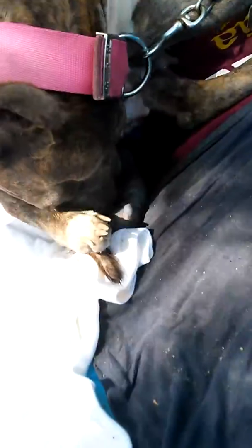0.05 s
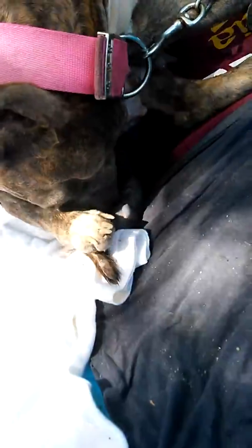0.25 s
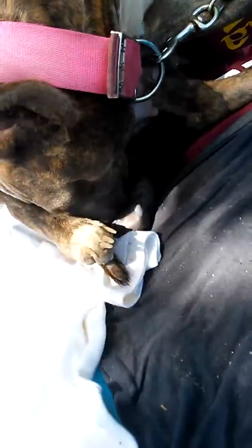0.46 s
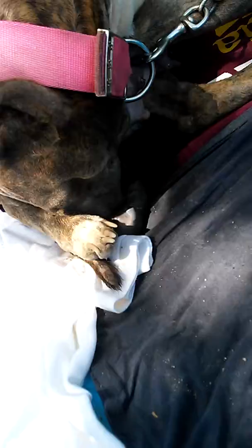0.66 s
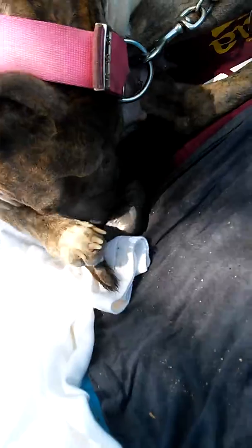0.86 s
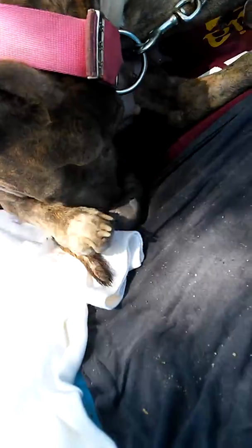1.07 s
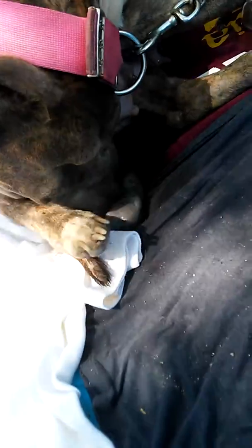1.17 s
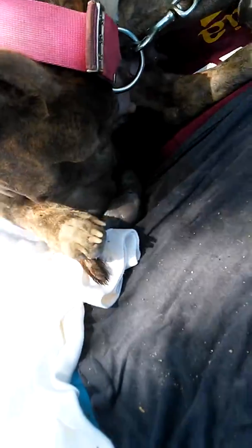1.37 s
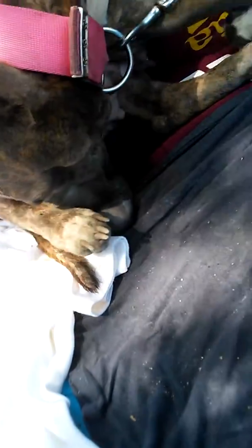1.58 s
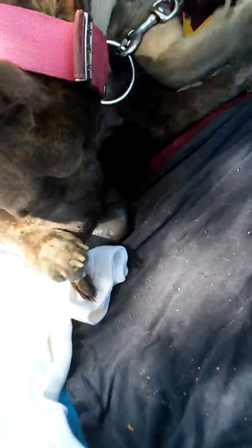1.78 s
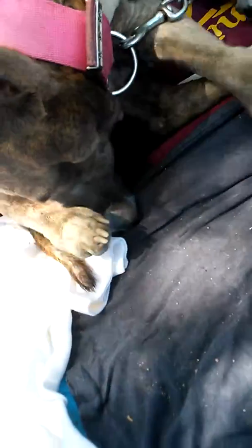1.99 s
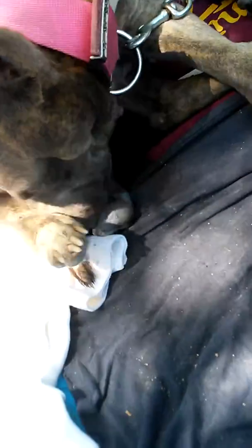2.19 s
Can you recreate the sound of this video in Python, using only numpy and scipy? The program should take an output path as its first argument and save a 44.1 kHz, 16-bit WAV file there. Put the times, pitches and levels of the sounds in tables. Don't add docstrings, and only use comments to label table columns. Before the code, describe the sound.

Dog licking, close and wet: smacks and sticky clicks at 0-0.12 s with heavy low thumps, another sharp cluster near 0.45, thin saliva squeaks at 0.65-0.77, then a smack at 0.82. A thump at 0.92 leads to quick sniffs from 1.0 and smacks around 1.24. Dull bumps run 1.4-1.66, a short wet lick at 1.68, faint whistles near 1.9, soft licking at 2.08. Dry cabin, low rumble, hiss, far chirring.

```python
import sys
import numpy as np
from scipy import signal
from scipy.fft import rfft, irfft, next_fast_len
from scipy.io import wavfile
from scipy.ndimage import uniform_filter1d, map_coordinates

SR = 44100
rng = np.random.default_rng(int(sys.argv[2]) if len(sys.argv) > 2 else 0)


def log_audio(samples):
    frames = np.atleast_2d(samples).T
    limited = np.clip(frames, -1, 1)
    pcm = np.round(limited * 32767).astype(np.int16)
    wavfile.write(sys.argv[1], SR, pcm)


def gain_from_db(level_db):
    decades = np.asarray(level_db, float) / 20
    return 10 ** decades


N = 98607
TIME_S = np.arange(N) / SR


def unit(x):
    return x / np.sqrt(np.mean(x ** 2) + 1e-20)


def wobble(rate_hz):
    knots = rng.standard_normal(int(N * 1000 / SR) + 4)
    return map_coordinates(knots, [TIME_S * rate_hz])


def filtered(x, response):
    m = next_fast_len(len(x) + SR // 4)
    return irfft(rfft(x, m) * response(np.fft.rfftfreq(m, 1 / SR)), m)[:len(x)]


def coloured(points):
    f, db = np.transpose(points)
    shape = lambda hz: gain_from_db(np.interp(np.log(hz + 1), np.log(f + 1), db))
    return unit(filtered(rng.standard_normal(N), shape))


def resonances(peaks):
    def response(f):
        total = 0
        for k, (centre, width, db) in enumerate(peaks):
            damping = 1j * f * width
            total = total + (-1) ** k * gain_from_db(db) * damping / (centre * centre - f * f + damping)
        return total
    return response


def rings(rows, sag, rise, noise):
    out, hiss = np.zeros(N), rng.standard_normal(N)
    for start_s, db, hz, t60_s in rows:
        first = int(start_s * SR)
        span = slice(first, first + SR // 6)
        u = np.clip(TIME_S[span] - start_s, 0, None)
        lag_s = u - t60_s / 4 * (1 - np.exp(-4 * u / t60_s))
        tone = np.sin(2 * np.pi * hz * (u - sag * lag_s))
        if noise:
            band = resonances([(hz, .38 * hz, 0)])
            tone = tone + noise * unit(filtered(hiss[span], lambda f: band(f) ** 2))
        swell = (1 - np.exp(-u / (rise * t60_s))) ** 2
        out[span] += gain_from_db(db - 60 * u / t60_s) * swell * tone
    return out


def bump(start_s, length_s, rise):
    u = np.clip((TIME_S - start_s) / length_s, 0, 1)
    return np.sin(np.pi / 2 * np.minimum(u / rise, (1 - u) / (1 - rise))) ** 2


def grainy_air():
    z = signal.stft(rng.standard_normal(N), nperseg=128)[2]
    grains = uniform_filter1d(rng.standard_normal(z.shape), size=2, axis=0)
    grains = uniform_filter1d(grains, size=4, axis=1)
    grain_db = 3.5
    return signal.istft(z * gain_from_db(grain_db * unit(grains)), nperseg=128)[1][:N]


def cabin(x, t60_s, dull_hz):
    t = np.arange(SR // 3) / SR
    tail = rng.standard_normal(len(t)) * gain_from_db(-60 * t / t60_s) * (t > .002)
    wet = signal.fftconvolve(x, tail / np.linalg.norm(tail))[:N]
    return filtered(wet, lambda hz: 1 / (1 + 1j * hz / dull_hz))


def draught():
    # (time [s], level [dB])
    strength = [(0, -27.5), (.1, -21.5), (0.301, -31.5), (.39, -26.5), (0.699, -36.5), (.95, -26),
                (1.33, -28), (1.45, -20), (1.682, -23.5), (1.82, -28.5), (2.236, -23.5)]
    # (frequency [Hz], density [dB per Hz])
    rumble = [(15, -50), (25, -29), (39, 4), (59, 3.5), (124, -14), (400, -32.5), (520, -29), (880, -120)]
    lumps_db = 1.5 * wobble(24.95)
    air = unit(coloured(rumble) * gain_from_db(lumps_db))
    return gain_from_db(np.interp(TIME_S, *np.transpose(strength))) * air


def hiss_bed():
    # (frequency [Hz], density [dB per Hz])
    spectrum = [(150, 10.5), (250, 2.5), (1550, -6), (1910, -6), (3170, -28), (4410, -20), (6140, -17),
                (8700, -18), (16000, -53)]
    level_db = -42 + 1.2 * wobble(6.2)
    return gain_from_db(level_db) * coloured(spectrum)


def far_chirring():
    # (frequency [Hz], width [Hz], level [dB])
    bands = [(8450, 1200, -53.5), (9700, 150, -59.5), (4350, 2230, -55.5)]
    # (time [s], level [dB])
    strength = [(0, 5.5), (.25, 4), (.55, -2), (.68, 2), (.9, -11.5), (1.1, 8.5), (1.5, -0.5), (2.236, 3.5)]
    out, swing_db = np.zeros(N), 1.5
    for hz, width_hz, db in bands:
        band = unit(filtered(rng.standard_normal(N), resonances([(hz, width_hz, 0)])))
        out += gain_from_db(db + swing_db * wobble(5.57)) * band
    return out * gain_from_db(np.interp(TIME_S, *np.transpose(strength)))


def saliva_ticks():
    # (time [s], peak level [dB], pitch [Hz], t60 [s])
    snaps = [(.001, -19, 3980, 0.021), (.003, -21.5, 5470, 0.011), (.0232, -22.5, 5630, 0.032),
             (.0718, -22, 5610, 0.023), (.362, -31.5, 3770, 0.028), (.4293, -25.5, 5600, 0.013),
             (.4562, -16.5, 9530, 0.013), (.456, -19, 5770, 0.008), (.4575, -20.5, 4340, 0.0096),
             (.4752, -25, 5930, 0.0093), (.768, -23, 5950, 0.011), (.8045, -21, 5150, 0.015),
             (.8185, -17.5, 5860, 0.016), (1.219, -24.5, 7100, 0.0243), (1.2285, -19.5, 6180, 0.018),
             (1.2446, -13.5, 5600, 0.0081), (1.612, -24, 3830, 0.023), (1.665, -25.5, 4570, 0.0206),
             (1.841, -26, 8600, 0.0053), (2.081, -26.5, 4850, 0.0083), (2.087, -27.5, 4900, 0.006),
             (2.033, -24.5, 2225, 0.026), (2.036, -24.5, 3570, 0.033), (2.039, -23, 4570, 0.017),
             (1.641, -24, 7900, 0.0072)]
    return gain_from_db(2.5) * rings(snaps, sag=0.186, rise=0.045, noise=0.78)


def tongue_pops():
    # (time [s], peak level [dB], pitch [Hz], t60 [s])
    openings = [(.044, -28.5, 1720, 0.04), (.0738, -10, 2190, 0.0065), (.0797, -15.5, 1630, 0.0068),
                (.1118, -12.5, 700, 0.0072), (.4295, -21, 1660, 0.0081), (.4518, -13.5, 1260, 0.012),
                (.4558, -10, 1680, 0.014), (.4749, -7, 1000, 0.0052), (.4785, -20.5, 720, 0.045),
                (.803, -26, 2060, 0.022), (.811, -25.5, 1835, 0.029), (.8183, -12.5, 674, 0.0082),
                (.8165, -11, 1900, 0.004), (.819, -7, 1870, 0.0027), (.002, -27, 2060, 0.018),
                (1.2232, -11, 545, 0.016), (1.2287, -13.5, 736, 0.021), (1.2375, -12.5, 1210, 0.011),
                (1.2445, -10.5, 2143, 0.013), (1.2478, -9, 2016, 0.014), (1.665, -25.5, 896, 0.016),
                (2.079, -23, 1080, 0.0077), (2.085, -23.5, 700, 0.017)]
    return -gain_from_db(4.5) * rings(openings, sag=0.15, rise=0.062, noise=0.51)


def thumps():
    # (time [s], peak level [dB], pitch [Hz])
    pushes = [(0.044, -11.5, 63), (0.059, -2.5, 60.5), (.081, -7, 107), (0.0956, 2.5, 88), (0.126, -7, 90),
              (0.907, -14, 114), (0.9157, -5, 122), (0.941, -9.5, 92.5), (.975, -17.5, 147),
              (1.364, -17.5, 88), (1.415, -2, 87.12), (1.474, -5.5, 108), (1.488, -12, 140),
              (1.494, -7.5, 134), (1.52, -11.5, 119), (1.547, -11, 134), (1.575, -7, 79), (1.607, -15, 131),
              (1.633, -15, 83), (1.66, -12, 73.6), (1.72, -34, 78)]
    cycles = 10.6
    rows = [(start_s, db, hz, cycles / hz) for start_s, db, hz in pushes]
    return rings(rows, sag=0.84, rise=0.0082, noise=0)


def spit_specks():
    # (time [s], peak level [dB], pitch [Hz], t60 [s])
    specks = [(0.072, -36, 14500, 0.021), (.0995, -39, 9860, 0.0098), (.106, -32.5, 8660, 0.013),
              (.1875, -40, 12000, .012), (0.357, -47, 13400, 0.017), (.4294, -39, 13400, 0.018),
              (0.454, -22, 14900, 0.0093), (0.7373, -33.5, 8900, 0.0078), (0.7664, -35, 8800, 0.01),
              (0.8003, -27, 7800, 0.011), (.7996, -37, 13900, .012), (0.8184, -30, 15200, 0.02),
              (.819, -24.5, 8400, 0.018), (1.15, -37, 8080, 0.024), (1.2457, -16.5, 9500, 0.004),
              (1.833, -32, 9200, .012), (1.9774, -37, 12200, 0.0086), (2.0946, -34, 10100, 0.0093),
              (2.079, -36, 8600, 0.019), (2.118, -35, 13200, .05), (1.654, -31, 4470, 0.017),
              (1.674, -22, 4530, 0.023), (2.047, -31, 4600, 0.0073)]
    return gain_from_db(-8) * rings(specks, sag=0, rise=0.045, noise=4)


def whistles():
    # (time [s], length [s], start pitch [Hz], end pitch [Hz], level [dB])
    high = [(.305, 0.066, 4330, 4100, -43), (.345, 0.016, 2670, 3000, -35.5),
            (.635, 0.024, 3000, 3080, -47), (.646, 0.026, 3407, 5600, -34), (.66, 0.028, 5100, 5600, -38),
            (.666, 0.0258, 5370, 3600, -30), (.684, 0.029, 3380, 3195, -35),
            (.656, 0.0116, 4463, 3900, -31), (.622, .036, 5700, 5740, -46.5), (.74, 0.013, 2710, 3150, -32),
            (1.142, 0.027, 2930, 3250, -38.5), (1.015, 0.023, 2980, 3050, -47),
            (1.685, 0.049, 5600, 7000, -50), (1.862, 0.02, 3850, 3470, -44), (.713, 0.018, 3030, 2940, -33),
            (.73, 0.015, 3360, 3155, -31), (.75, 0.021, 4100, 4440, -31.5), (.768, 0.024, 4600, 4150, -41),
            (.955, 0.11, 3650, 4690, -46), (1.58, 0.024, 3920, 3260, -42), (1.603, .016, 2450, 2260, -38),
            (1.79, 0.058, 4300, 4100, -46), (1.842, 0.03, 2800, 2700, -46), (1.845, 0.065, 4680, 4480, -42),
            (1.88, 0.054, 3536, 4270, -34.5), (1.89, 0.098, 3600, 2604, -38), (1.9, .07, 4440, 3800, -39),
            (2.115, 0.043, 5000, 4330, -49)]
    # (time [s], length [s], start pitch [Hz], end pitch [Hz], level [dB])
    gurgles = [(0.294, 0.017, 640, 650, -35.5), (0.687, 0.036, 760, 700, -40.5),
               (.724, 0.017, 660, 610, -33.5), (1.012, .045, 700, 785, -34), (1.044, 0.058, 800, 754, -37),
               (1.529, 0.033, 580, 634, -44.5), (1.595, 0.052, 700, 574, -41.5),
               (1.653, 0.028, 440, 446, -34), (1.666, 0.031, 570, 584, -35.5),
               (1.687, 0.021, 760, 770, -33.5), (1.717, 0.073, 460, 501, -39.5)]
    fuzz_hz, flutter_db, halo = 55 * wobble(400), 2.5 * wobble(250), 0.5 * wobble(900)
    out = np.zeros(N)
    for k, (start_s, length_s, start_hz, end_hz, db) in enumerate([*high, *gurgles]):
        shift = 997 * k
        u = np.clip((TIME_S - start_s) / length_s, 0, 1)
        hz = start_hz + (end_hz - start_hz) * u + np.roll(fuzz_hz, shift)
        gain = gain_from_db(db + np.roll(flutter_db, shift)) * bump(start_s, length_s, 0.32)
        out += gain * (1 + np.roll(halo, shift)) * np.sin(2 * np.pi * np.cumsum(hz) / SR)
    return out + gain_from_db(-3) * cabin(out, t60_s=0.27, dull_hz=10000)


def snorts():
    # (time [s], length [s], level [dB], main resonance [Hz])
    puffs = [(0.35, 0.038, -44.5, 3800), (0.645, 0.39, -52.5, 3920), (0.949, 0.05, -36, 3800),
             (1.03, 0.034, -28.5, 3780), (1.105, 0.03, -27, 4010), (1.27, 0.2, -50, 3800),
             (1.172, 0.033, -26, 3800), (1.199, 0.043, -34.5, 4100), (1.266, 0.029, -24, 3890),
             (1.571, 0.029, -46, 5400), (1.592, 0.06, -42, 4060), (1.778, 0.32, -49, 3950),
             (1.124, 0.05, -36.5, 3700), (2.127, 0.029, -46, 4920)]
    # (frequency [Hz], width [Hz], level [dB])
    nose = [(700, 120, -9), (2430, 295, -5), (3150, 690, -3), (3800, 137, 6.5), (4100, 92, 7.5),
            (5670, 270, -3.5), (6770, 340, -11.5), (9900, 810, -7)]
    rest_hz, narrow_share, rise, linger_db = 3950, 0.88, 0.3, -11
    air, out = grainy_air(), np.zeros(N)

    def through_nose(x, scale):
        return unit(filtered(x, resonances([(scale * hz, width, db) for hz, width, db in nose])))

    for start_s, length_s, db, main_hz in puffs:
        span = slice(int(start_s * SR), int((start_s + 2 * length_s) * SR))
        narrow = through_nose(air[span], narrow_share * main_hz / rest_hz)
        wide = through_nose(air[span], main_hz / rest_hz)
        flare = np.clip((TIME_S[span] - start_s) / (2 * rise * length_s), 0, 1) * np.pi / 2
        swell = bump(start_s, length_s, rise)
        swell += gain_from_db(linger_db) * bump(start_s, 2 * length_s, rise / 2)
        out[span] += gain_from_db(db) * swell[span] * (np.cos(flare) * narrow + np.sin(flare) * wide)
    return out


def strokes():
    # (time [s], length [s], level [dB])
    licks = [
        (1.676, 0.052, -29.5),
        (1.696, 0.19, -50.5),
        (2.078, 0.21, -47.5),
        (0.67, 0.11, -46.5),
        (0.986, 0.21, -47),
    ]
    # (frequency [Hz], width [Hz], level [dB])
    mouth = [(700, 350, -12.5), (2050, 510, 1), (5600, 3100, -7)]
    crackle = gain_from_db(0.89 * wobble(600))
    wet = unit(filtered(grainy_air() * crackle, resonances(mouth)))
    return wet * sum(gain_from_db(db) * bump(start_s, length_s, 0.19) for start_s, length_s, db in licks)


def scene():
    dog = saliva_ticks() + tongue_pops() + spit_specks() + snorts() + strokes()
    answer = gain_from_db(-8.5) * cabin(dog, t60_s=0.16, dull_hz=5000)
    air = draught() + hiss_bed() + far_chirring()
    return (dog + answer + whistles() + thumps() + air)[None]


def roll_off(x):
    return signal.sosfilt(signal.butter(12, 17060, fs=SR, output="sos"), x)


def record(dry):
    low_cut_hz, dull_hz, top_hz, self_noise_db = 44.3, 12000, 15900, -61.5

    def microphone(hz):
        low_cut = (1j * hz / low_cut_hz / (1 + 1j * hz / low_cut_hz)) ** 3
        return low_cut * (hz < top_hz) / np.sqrt(1 + (hz / dull_hz) ** 4)

    self_noise = filtered(rng.standard_normal(N), lambda hz: hz < top_hz)
    x = filtered(dry[0], microphone) + gain_from_db(self_noise_db) * self_noise
    return roll_off(x[None])


dry = scene()
out = record(dry)
log_audio(out)
```